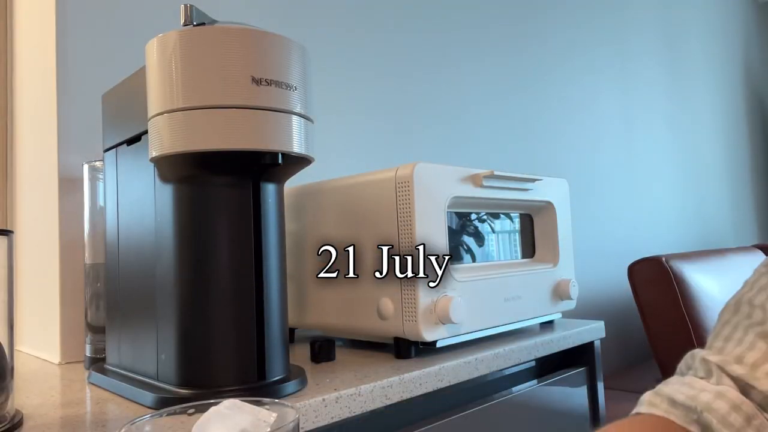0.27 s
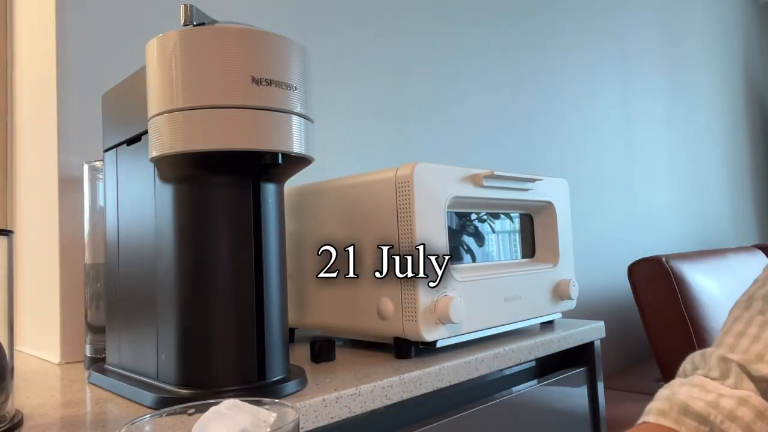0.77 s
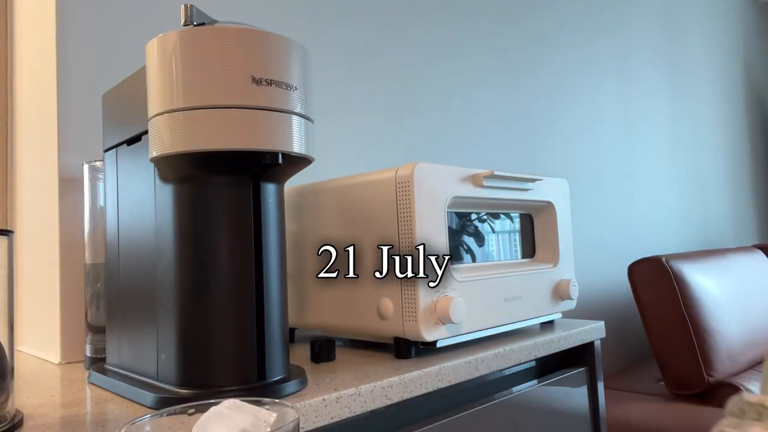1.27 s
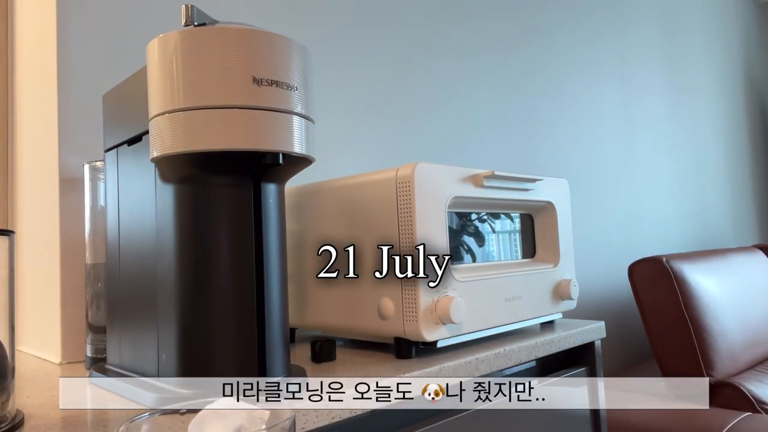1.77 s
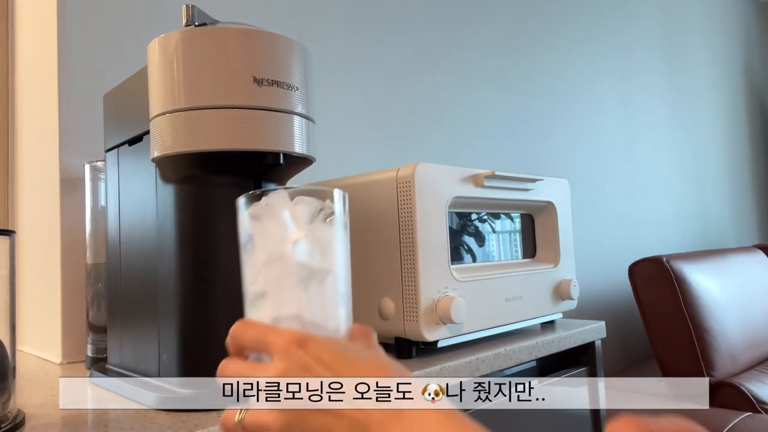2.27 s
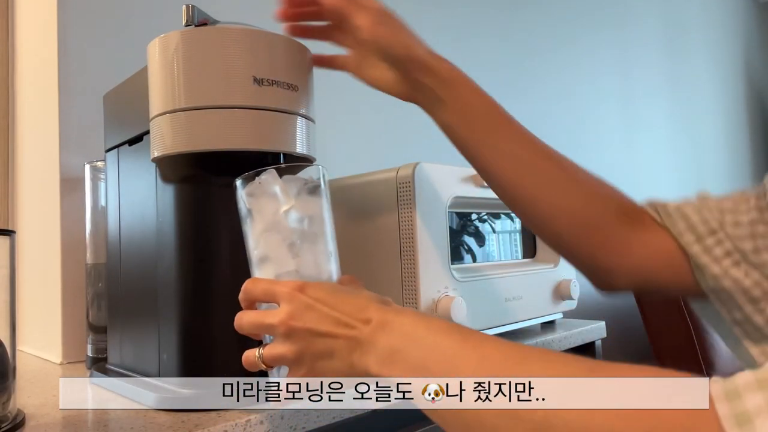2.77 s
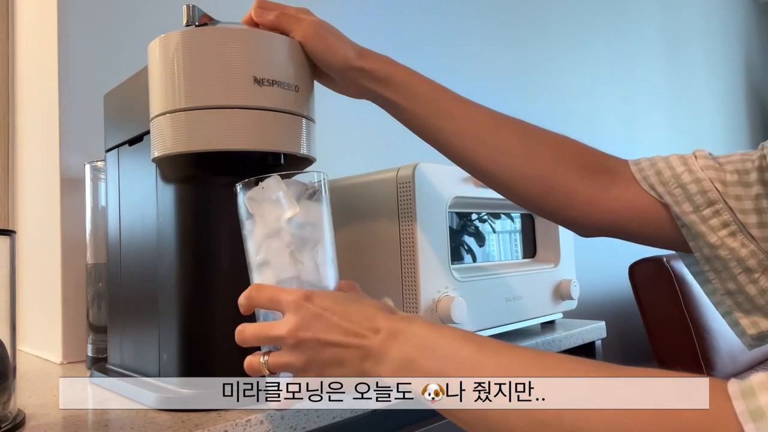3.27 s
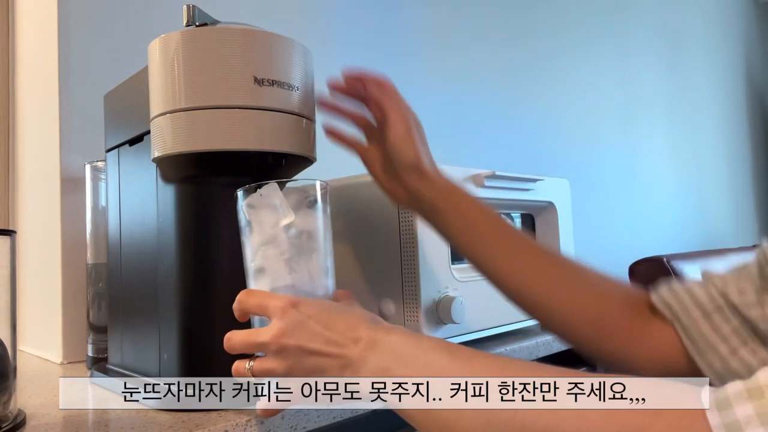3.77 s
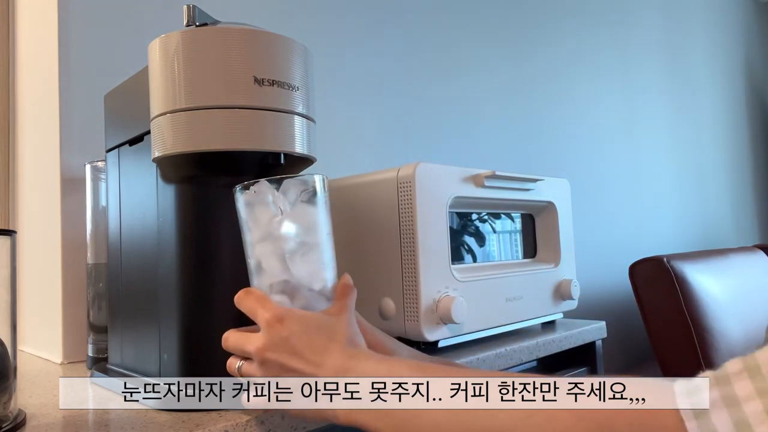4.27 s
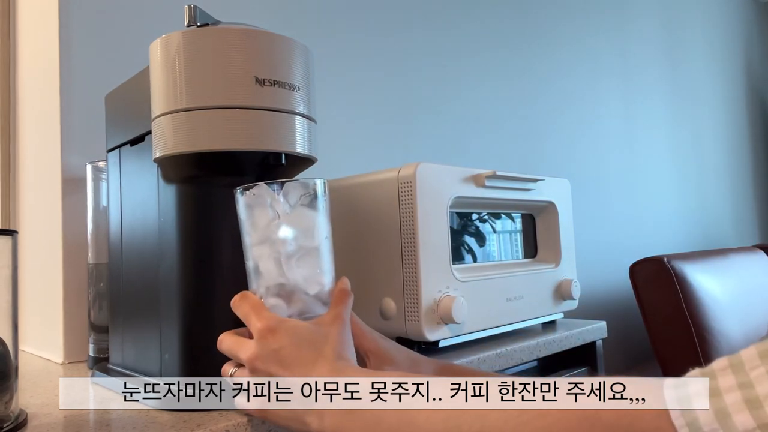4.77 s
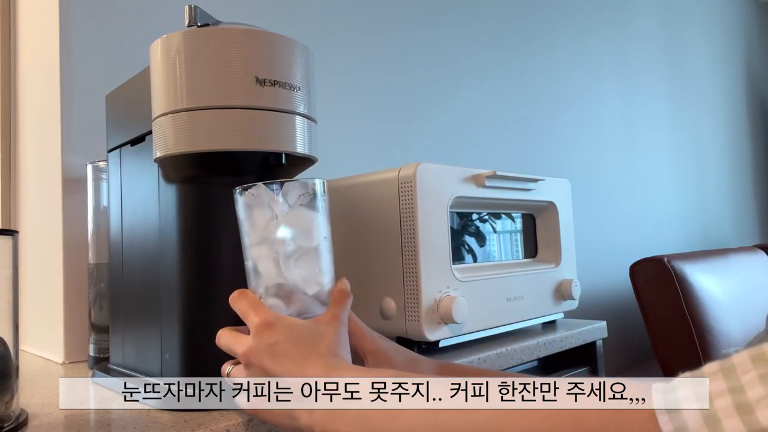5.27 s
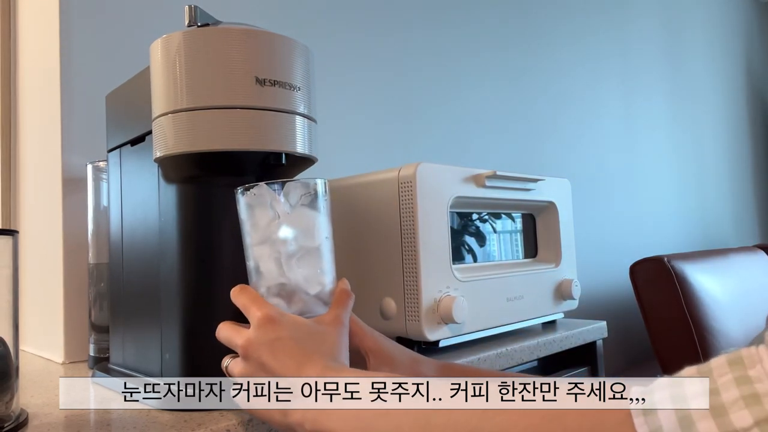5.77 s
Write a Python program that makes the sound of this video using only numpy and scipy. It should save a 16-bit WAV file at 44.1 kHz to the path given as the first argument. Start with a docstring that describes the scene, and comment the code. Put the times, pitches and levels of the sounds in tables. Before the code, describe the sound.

Two bursts of hard plastic clacking, far louder than everything else, open the scene after a faint fabric rustle. A small live kitchen and soft room hum remain, with dull counter bumps and faint glassy ticks. After some light handling of the machine, a crisp relay click with a tiny hiss starts an electric motor, whose pitch climbs continuously from a low purr to a fuller, brighter whir.

```python
"""A quiet kitchen: coloured noise, low hum and a faint high whistle as room tone; grainy noise for cloth slides.
A plastic lid clacks shut in two bursts (0.5 and 0.9 s): rattling contacts ring its modes and crack.
From 1.4 s damped low modes thump through the counter; from 1.9 s noise cracks tick like ice in a glass
and a relay, while fingers and a button ring the machine head. At 3.54 s a short hiss sounds and the motor
spins up: shaft-speed multiples whine upward through the casing over a throbbing rumble."""
import sys
import numpy as np
from scipy import signal
from scipy.fft import rfft, irfft, next_fast_len
from scipy.io import wavfile

SR = 44100
rng = np.random.default_rng(int(sys.argv[2]) if len(sys.argv) > 2 else 0)


def linear_from_db(decibels):
    """Turn decibels (scalar or array-like) into linear amplitude factors; 0 gives 1."""
    return 10 ** (np.asarray(decibels, float) / 20)


def transcribe(u):
    """Save the signal u as a 16-bit wav file named by the first command-line argument.

    u: samples, shape (n,) or (channels, n), limited to [-1, 1]; the rate is SR.
    q: integer samples, one column per channel.
    """
    v = np.clip(np.atleast_2d(u).T, -1, 1)
    q = np.round(v * 32767).astype(np.int16)
    wavfile.write(sys.argv[1], SR, q)


N = 265784


def in_time(curve):
    """Interpolate a (time [s], value) curve to one value a sample."""
    time_s, value = np.transpose(curve)
    return np.interp(np.arange(N) / SR, time_s, value)


def at_hz(spectrum, hz):
    """Interpolate a (frequency [Hz], value) curve on a log-frequency axis."""
    points = np.array(spectrum, float)
    log_hz = np.log(np.maximum(points[:, 0], 1))
    return np.interp(np.log(np.maximum(hz, 1)), log_hz, points[:, 1])


def rms_one(x):
    """Scale to unit rms."""
    return x / np.sqrt(np.mean(x ** 2) + 1e-20)


def colour(x, spectrum):
    """Causal minimum-phase filter with the given dB response, via the folded cepstrum."""
    size = 8192
    log_gain = at_hz(spectrum, np.arange(size // 2 + 1) * SR / size) * np.log(10) / 20
    cepstrum = irfft(log_gain)
    cepstrum[1:size // 2] *= 2
    cepstrum[size // 2 + 1:] = 0
    impulse = irfft(np.exp(rfft(cepstrum)))[:size // 2]
    return signal.fftconvolve(x, impulse)[:len(x)]


def noise(spectrum):
    """Coloured Gaussian noise of unit rms, filter onset discarded."""
    return rms_one(colour(rng.standard_normal(N + 4096), spectrum)[4096:])


def drift(corner_hz):
    """Slow random wander of unit rms: noise through two equal poles, computed every 40 samples."""
    pole = np.exp(-80 * np.pi * corner_hz / SR)
    white = rng.standard_normal(N // 40 + 2002)
    slow = signal.lfilter([1], [1, -2 * pole, pole * pole], white)[2000:]
    return np.interp(np.arange(N) / 40, np.arange(len(slow)), rms_one(slow))


def ring(clicks, hz, t60_s):
    """Two-pole resonator: a unit click starts a decaying sine of height 1."""
    radius = linear_from_db(-60 / (t60_s * SR))
    w = 2 * np.pi * hz / SR
    return signal.lfilter([0, np.sin(w)], [1, -2 * radius * np.cos(w), radius * radius], clicks + 1e-18)


def add(out, time_s, sound):
    """Mix a sound into out at a time."""
    at = round(time_s * SR)
    out[at:at + len(sound)] += sound[:N - at]


# mid level of the air: (time [s], level [dB])
AIR_LEVEL = [(0.0, -58.5), (0.85, -57.5), (1.1, -54.5), (2.0, -55.5), (3.3, -56.5)]
# mid spectrum: (frequency [Hz], relative level [dB])
AIR_MID = [(15, -52.5), (25, -30), (48, -12), (70, -7.5), (110, -11.5), (190, -7.5), (300, -11), (400, -19),
           (1100, -22), (1600, -30.5), (2300, -35), (3000, -46.5), (5000, -54), (8600, -51.5),
           (11500, -75.5), (13200, -49.5), (16000, -55.5)]
# side spectrum: (frequency [Hz], relative level [dB])
AIR_SIDE = [(15, -61), (25, -24), (59, 0), (145, -12), (175, 8.5), (206, -28), (270, 2), (1400, -8.5),
            (4250, -39), (11300, -31.5), (16000, -30.5)]
# wavering tones, low hum and a faint high whistle: (frequency [Hz], relative level [dB])
WAVERING_TONES = [(59.5, -62.5), (119, -71), (180, -62.5), (14700, -89.5)]
AIR_SIDE_DB = -3.5  # against mid


def room_tone():
    """Air and a far appliance: independent mid and side noise; tones wavering in level and phase in mid."""
    level_db = in_time(AIR_LEVEL)
    angle = 2 * np.pi * np.arange(N) / SR
    tones = 0
    for hz, db in WAVERING_TONES:
        tone_db = db + 1.5 + 0.83 * drift(12.0)
        tones = tones + linear_from_db(tone_db) * np.sin(hz * angle + 0.2 * drift(3.0))
    mid = linear_from_db(level_db + drift(7.0)) * noise(AIR_MID)
    side = linear_from_db(level_db + AIR_SIDE_DB + .8 * drift(3.4)) * noise(AIR_SIDE)
    return mid + tones * linear_from_db(level_db - level_db.mean()), side


# cloth slides: (time [s], level before sag [dB], length of slide [s])
SLIDES = [(0.065, -57.5, 0.13), (0.335, -61.5, 0.048), (1.352, -67, 0.22), (2.05, -82, 0.18),
          (2.7, -86, .15)]
# cloth spectrum: (frequency [Hz], relative level [dB])
CLOTH_SPECTRUM = [(2500, -33), (4000, -5), (5500, 0), (8000, 4), (10500, -2), (12800, 0), (15000, -4.5),
                  (16500, -13.5)]
SLIDE_RISE_S, SLIDE_SAG_DB_PER_S = .02, 38
SLIDE_STOP_DB_PER_S = 199.5  # added to the sag


def rustle():
    """Cloth slides: grainy treble noise rises fast, sags while moving, fades faster once stopped."""
    level = 0
    for time_s, db, length_s in SLIDES:
        t = np.arange(N) / SR - time_s
        sag_db = SLIDE_SAG_DB_PER_S * np.maximum(t, 0)
        stop_db = SLIDE_STOP_DB_PER_S * np.maximum(t - length_s, 0)
        level = level + np.clip(t / SLIDE_RISE_S, 0, 1) ** 2 * linear_from_db(db - sag_db - stop_db)
    return level * linear_from_db(1.5 * drift(36.0)) * noise(CLOTH_SPECTRUM)


# broad contact crack: (frequency [Hz], relative level [dB])
CRACK_SPECTRUM = [(200, -11.5), (1200, 6), (2600, 16), (4300, 3), (6500, -5.5), (8000, -5.5), (9500, -17),
                  (12000, -34), (16000, -36)]
CRACK_DB, RISE_S, RATTLE_SHARE = 7, 0.0018, .55


def blows(events, modes_table):
    """Contacts build up and rattle away, cracking and striking each mode with a new random strength."""
    out, t = np.zeros(N), np.arange(SR // 5) / SR
    for time_s, db, treble_db, bass_db, rattle_s in events:
        sizes = rng.standard_normal(len(t)) * (rng.random(len(t)) < .25)  # sparse contacts
        build = np.minimum(t / RISE_S, 1) ** 3
        decay = np.exp(-(t / max(rattle_s, 1e-4) / 2) ** 2)
        contacts = RATTLE_SHARE * sizes * build * decay
        contacts[round(RISE_S * SR)] += 1  # main impact
        spread_db = rng.normal(0, 3.0, len(modes_table))
        modes = 0
        for (hz, mode_db, t60_s), chance_db in zip(modes_table, spread_db):
            modes = modes + linear_from_db(mode_db + chance_db) * ring(contacts, hz, t60_s)
        blow = modes + linear_from_db(CRACK_DB) * colour(contacts, CRACK_SPECTRUM)
        blow = colour(blow, [(300, bass_db), (1200, 0), (5000, treble_db), (13000, 1.8 * treble_db)])
        add(out, time_s, linear_from_db(db) * blow / np.abs(blow).max())
    # microphone rolloff: no deep bass, little top
    return colour(out, [(20, -40), (130, 0.5), (9000, -3), (11000, -18), (16000, -24)])


# lid clacks: (time [s], peak before microphone rolloff [dB], gain at 5 kHz [dB], gain at 300 Hz [dB],
# half the rattle's 1/e time [s])
LID_CLACKS = [(0.472, -30, -2.5, -13.5, 0.0076), (0.484, 3.5, 8, -18, 0.0018),
              (0.499, -2.5, 5.5, -7.5, 0.0041), (0.63, -1, 15, 0.5, 0.0042), (0.738, -45, -12, 5, 0.0029),
              (0.936, -17.5, 13.5, 4, 0.02), (0.943, -9.5, 25.5, -27, 0.0034),
              (0.994, -19.5, 11, -19.5, 0.0054), (1.004, -8.5, 17, -1.5, 0.0071),
              (1.01, -11.5, 31, -2, 0.0024), (1.051, -1, 15.5, 0.5, 0.0047),
              (1.064, -5, 22.5, -11.5, 0.0036), (1.074, -13, 7, 0, 0.006), (1.12, -23.5, -1, 0, 0.0027),
              (1.136, -16, 7, -3, 0.0045)]
# lid modes: (frequency [Hz], mean relative strength [dB], t60 [s])
LID_MODES = [(145.3, -22.5, 0.14), (278, -8, 0.12), (330, -17, .05), (381, -11, 0.064), (524, -8, 0.024),
             (612, -7, 0.0066), (695, 0, 0.01), (846, -7, 0.063), (950, -7.5, 0.025), (1086, -5.5, 0.013),
             (1175, -8.5, 0.031), (1250, -12, 0.0089), (1369, -9.5, 0.025), (1590, -1, 0.0083),
             (1805, 1, 0.004), (1885, -13.5, 0.05), (2075, 1, 0.0067), (3100, -17, 0.0094),
             (4240, -15.5, .01), (4976, -18, 0.0094), (7820, -20, .005)]


def lid():
    """Plastic lid: short, heavily damped modes under each clack."""
    return blows(LID_CLACKS, LID_MODES)


# counter thumps: (time [s], peak [dB], mode frequency [Hz])
COUNTER_THUMPS = [(1.42, -41, 56.5), (1.437, -36, 77.1), (1.52, -40.5, 71), (1.679, -40.5, 70.0),
                  (1.779, -47, 56.3), (1.904, -45, 130), (2.498, -47.5, 61.9), (2.97, -44.5, 58.5),
                  (4.56, -47, 157), (4.597, -44, 131), (4.649, -46, 61.7)]


def thumps():
    """Soft pushes through the counter: a slow contact rings one low mode."""
    out, t = np.zeros(N), np.arange(SR // 4) / SR
    contact = np.gradient(np.exp(-((t - .012) / 0.0028) ** 2))
    for time_s, db, hz in COUNTER_THUMPS:
        thump = ring(contact, hz, 0.19)
        add(out, time_s - .01, linear_from_db(db) * thump / np.abs(thump).max())
    return out


# ice and relay ticks: (time [s], peak [dB], pitch [Hz])
HARD_TICKS = [(1.8947, -52.5, 3580), (2.779, -48, 6110), (2.8014, -51, 2530), (2.8234, -53.5, 2240),
              (2.8777, -54, 3580), (2.8901, -44.5, 4300), (2.9064, -45.5, 2260), (3.3574, -47, 3080),
              (3.5368, -25, 3100), (4.0684, -51, 2260)]


def ticks():
    """Hard small contacts: a fast-decaying noise crack, strongest about its pitch."""
    out, t = np.zeros(N), np.arange(SR // 8) / SR
    for time_s, db, hz in HARD_TICKS:
        click = rng.standard_normal(len(t)) * np.exp(-t / 0.0035)
        tick = colour(click, [(hz / 4, -22), (hz / 1.2, -7), (hz, 0), (hz * 1.2, -8), (hz * 1.55, -5),
                              (hz * 1.9, -13), (hz * 2.7, -11), (hz * 5, -26)])
        add(out, time_s, linear_from_db(db) * tick / np.abs(tick).max())
    return out


# fingers and button: (time [s], peak before microphone rolloff [dB], gain at 5 kHz [dB],
# gain at 300 Hz [dB], half the rattle's 1/e time [s])
HEAD_TOUCHES = [(1.907, -39.5, -13, 26, 0.011), (2.784, -39.5, 17, 11, 0.0082),
                (2.802, -38, 21, 19, 0.0052), (2.849, -47, -3, 15, 0.0076), (2.892, -39.5, 17, 1, 0.011),
                (3.355, -33.5, -3.5, -30, 0.01), (3.417, -37, -1, -6, 0.022), (3.478, -35.5, 10, 0, 0.0049),
                (3.494, -27.5, 6, 3, 0.013), (3.52, -34.5, -17, -6.5, 0.02), (3.912, -36, -12, 2.5, 0.0044),
                (4.085, -36.5, -8, -2, 0.0048)]
# machine head modes: (frequency [Hz], mean relative strength [dB], t60 [s])
HEAD_MODES = [(138, -29, 0.098), (253, -5, 0.57), (302.5, 0.5, 0.17), (381, 10, 0.058), (450, 9, 0.062),
              (495, 20.5, 0.015), (634, -2.5, 0.11), (847, 12, 0.011), (1253, 5.5, 0.011),
              (1720, -5, 0.006)]


def head_touches():
    """Fingers and button: light contacts ring the machine head's low modes."""
    return blows(HEAD_TOUCHES, HEAD_MODES)


MOTOR_START_S = 3.54


def start_hiss():
    """Switch closes: a short band of hiss decays exponentially."""
    t = np.arange(N) / SR - MOTOR_START_S
    hiss = noise([(1500, -23), (2500, -5), (2800, 5), (3200, 1.5), (3600, -13), (4200, -49),
                  (4800, -5), (5500, -45), (8500, -10), (14000, -60)])
    return linear_from_db(-45.5 - 167.0 * np.maximum(t, 0)) * (t > 0) * hiss


# shaft speed: (time [s], speed [turns/s])
SHAFT_SPEED = [(3.6, 14.4), (3.67, 17.5), (3.73, 20.3), (3.84, 25.2), (3.92, 28.8), (4.02, 33.0),
               (4.24, 44.0), (4.31, 46.3), (4.58, 55.5), (4.87, 65.6), (5.0, 70.4), (5.53, 89.5),
               (6.02, 105.2)]
# sounding orders: (multiple of shaft speed)
SHAFT_MULTIPLES = [.5, 1, 2, 3, 4, 5, 6, 7, 8, 9, 10, 11, 12, 13, 15, 17, 18, 19, 34, 37, 38, 40]
# drive of each order: (relative level [dB])
MULTIPLE_DB = [5, -15, -11.5, 0.5, -6.5, -8.5, -2, -14.5, -8.5, -12.5, -7.5, -22.5, -17.5, -26.5, -14,
               -14.5, -16, -15, -21.5, -27, -28.5, -29]
# casing transmission of tones: (frequency [Hz], gain [dB])
CASING_GAIN = [(30, -26.5), (44, -23), (52, -6), (100, -37.5), (190, -1), (225, -2), (262, 10), (300, 3),
               (340, 6.5), (420, -2), (480, 5.5), (550, 3), (635, 8.5), (720, -6), (830, -1.5),
               (1100, -3.5), (1400, -8), (1720, -1), (2000, -6.5), (2400, -4), (2800, 3.5), (3100, -1.5),
               (3500, 6), (3800, 2), (4100, 6.5), (4500, -5), (6000, -23)]
# rumble spectrum: (frequency [Hz], relative level [dB])
RUMBLE_SPECTRUM = [(35, -43), (60, 1.5), (127, -2), (300, -1.5), (560, -1.5), (635, -0.5), (720, -7),
                   (1000, -7.5), (1110, -13.5), (1300, -15.5), (1750, -15), (2300, -23.5), (3500, -20),
                   (4500, -23), (6900, -27), (8300, -32.5), (10000, -49.5), (12500, -43.5), (16000, -41)]
MIDDLE_TURNS_PER_S = 60
HUM_DB, WHINE_DB, RUMBLE_DB = -51, -39, -51  # at middle speed, before swell
HUM_DB_PER_DOUBLING, WHINE_DB_PER_DOUBLING, RUMBLE_DB_PER_DOUBLING = 3.3, 1.3, 4
# hum and rumble swell as the shaft nears a resonance of its mount
UNBALANCE_DB, UNBALANCE_TURNS_PER_S = 2.5, 111.7
BRIGHTEN_DB_PER_DOUBLING, HISS_FROM_HZ = 6, 2000  # extra gain of the rumble's treble
HUNT_RAD = .02  # rms lead and lag of the shaft
FLICKER_DB_PER_MULTIPLE = .07


def motor():
    """Shaft-order tones pass the casing; noise rumble throbs once a turn; drive grows with speed."""
    turns = in_time(SHAFT_SPEED)
    doublings = np.log2(turns / MIDDLE_TURNS_PER_S)
    swell_db = UNBALANCE_DB * (turns / UNBALANCE_TURNS_PER_S) ** 6
    hum_db = HUM_DB + HUM_DB_PER_DOUBLING * doublings + swell_db
    whine_db = WHINE_DB + WHINE_DB_PER_DOUBLING * doublings
    rumble_db = RUMBLE_DB + RUMBLE_DB_PER_DOUBLING * doublings + swell_db
    running = np.clip((np.arange(N) / SR - MOTOR_START_S) / 0.13, 0, 1)
    angle = 2 * np.pi * np.cumsum(turns) / SR + HUNT_RAD * drift(6.0)
    tones = 0
    for multiple, db in zip(SHAFT_MULTIPLES, MULTIPLE_DB):
        wobble_rad = .01 * multiple * drift(20.0)  # higher orders blur more
        drive_db = whine_db if multiple > 25 else hum_db  # high orders come from the motor slots
        flicker_db = (1.2 + FLICKER_DB_PER_MULTIPLE * multiple) * drift(4.0)
        level_db = drive_db + db + at_hz(CASING_GAIN, multiple * turns) + flicker_db
        phase = multiple * angle + wobble_rad + rng.uniform(0, 2 * np.pi)
        tones = tones + linear_from_db(level_db) * np.sin(phase)
    throb = 1 + 0.14 * np.sin(angle)
    roar = noise(RUMBLE_SPECTRUM)
    highpass = signal.butter(2, HISS_FROM_HZ, "high", fs=SR, output="sos")
    hiss = signal.sosfilt(highpass, roar)
    roar = roar + (linear_from_db(BRIGHTEN_DB_PER_DOUBLING * doublings) - 1) * hiss
    rumble = linear_from_db(rumble_db + .8 * drift(8.0)) * throb * roar
    return running * tones, running * rumble


# room decay: (frequency [Hz], t60 [s])
DECAY_T60 = [(100, 0.82), (500, 0.63), (2000, 0.44), (6000, .4), (14000, 0.067)]


def room(x):
    """Diffuse tail: octave noise bands decay at their own t60 after the first walls; tail energy 1."""
    t, tail = np.arange(int(.7 * SR)) / SR, 0
    edges_hz = 60 * 2 ** np.arange(0, 8.1, 1)
    for low, high in zip(edges_hz, edges_hz[1:]):
        bandpass = signal.butter(2, [low, high], "band", fs=SR, output="sos")
        band = signal.sosfilt(bandpass, rng.standard_normal(len(t)))
        tail = tail + band * linear_from_db(-60 * t / at_hz(DECAY_T60, np.sqrt(low * high)))
    tail = tail * np.clip((t - .004) / 0.004, 0, 1)
    return signal.fftconvolve(x, tail / np.sqrt(np.sum(tail ** 2)))[:N]


# diffuse sound, side against mid: (frequency [Hz], gain [dB])
DIFFUSE_SIDE = [(60, -5), (200, -5), (400, 0), (1000, 0), (2000, 2), (4000, -5), (8000, 3), (15000, 8)]


def diffuse(wet):
    """Two unrelated room tails give mid and side; a filter sets side against mid."""
    return room(wet), colour(room(wet), DIFFUSE_SIDE)


PORT_LAG_S = 48e-6


def ports(x, left_over_right_db):
    """Direct sound reaches the right port slightly later than the left, by an FFT phase slope."""
    size = next_fast_len(N + 64)
    hz = np.arange(size // 2 + 1) * SR / size
    right = irfft(rfft(x, size) * np.exp(-2j * np.pi * hz * PORT_LAG_S), size)[:N]
    return np.array([x * linear_from_db(left_over_right_db / 2), right * linear_from_db(-left_over_right_db / 2)])


def scene():
    """Direct sounds at two ports; room tails and room tone as unrelated mid and side."""
    tone_mid, tone_side = room_tone()
    hits = lid() + ticks() + head_touches() + start_hiss()
    tones, rumble = motor()
    wet = linear_from_db(-14.5) * hits + linear_from_db(-8.5) * rumble + linear_from_db(-10) * tones
    tail_mid, tail_side = diffuse(wet)
    mid, side = tail_mid + tone_mid, tail_side + tone_side
    direct = ports(hits + rustle() + thumps(), .4) + ports(tones + rumble, 2.5)
    return direct + np.array([mid + side, mid - side])


def top_cut(x):
    """Nothing passes above the cut-off."""
    return signal.sosfilt(signal.butter(12, 16940, fs=SR, output="sos"), x)


def record(dry):
    """Converter clips hard at 0.95 of full scale."""
    mix = np.clip(dry, -.95, .95)
    return top_cut(mix)


dry = scene()
out = record(dry)
transcribe(out)
```